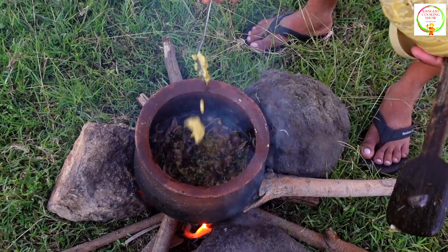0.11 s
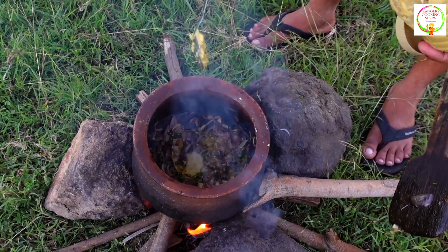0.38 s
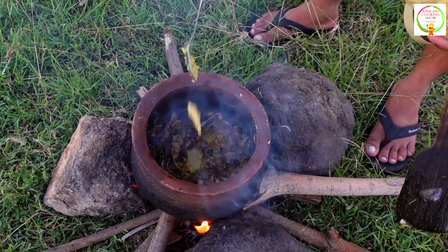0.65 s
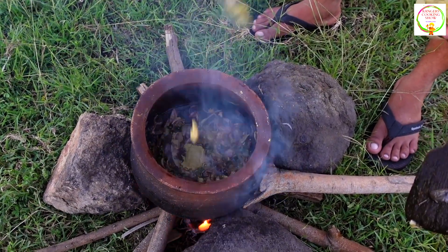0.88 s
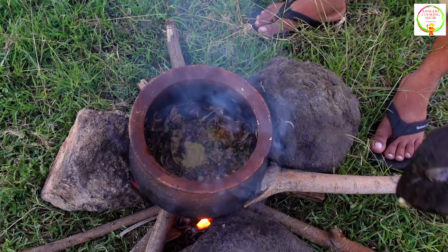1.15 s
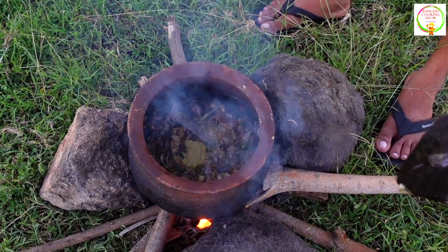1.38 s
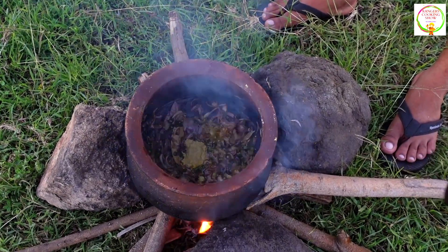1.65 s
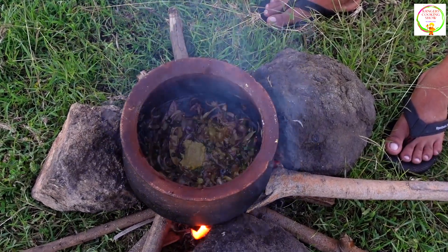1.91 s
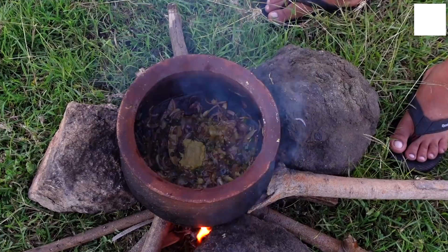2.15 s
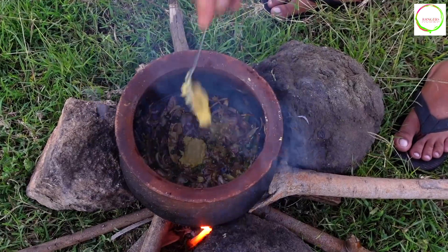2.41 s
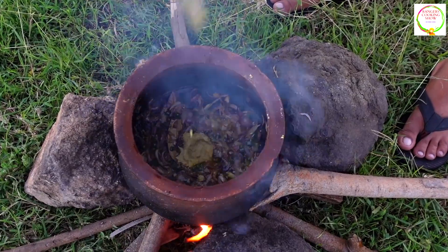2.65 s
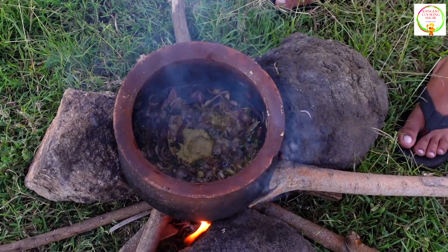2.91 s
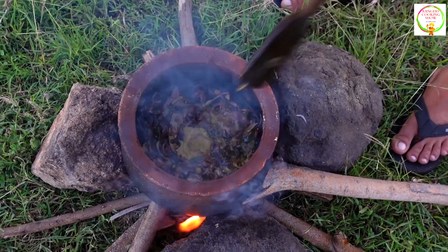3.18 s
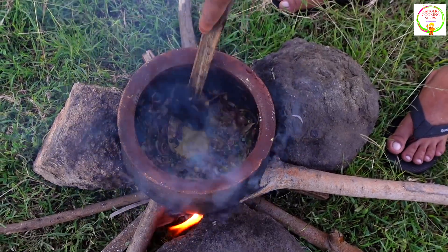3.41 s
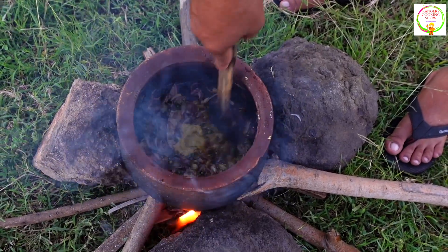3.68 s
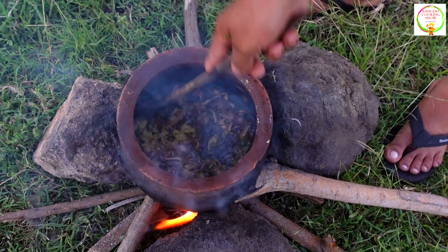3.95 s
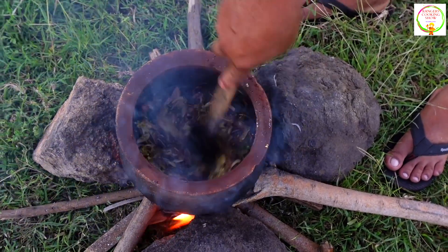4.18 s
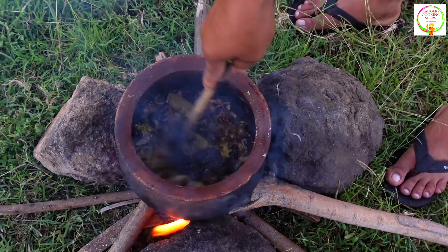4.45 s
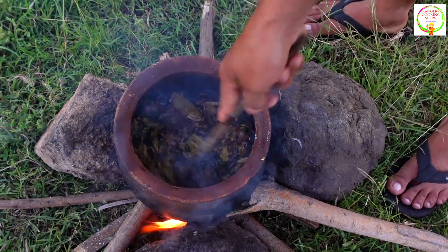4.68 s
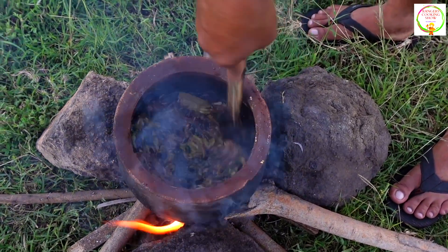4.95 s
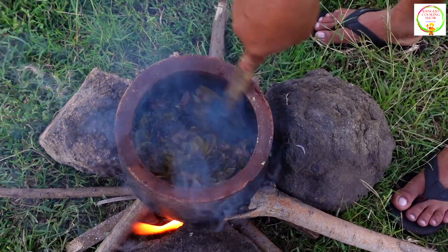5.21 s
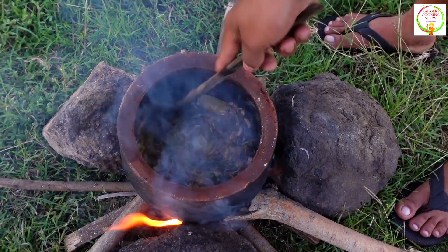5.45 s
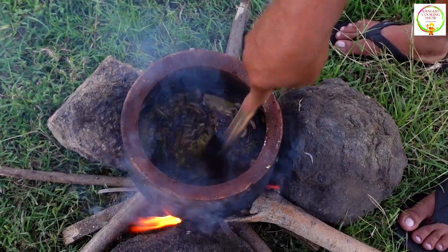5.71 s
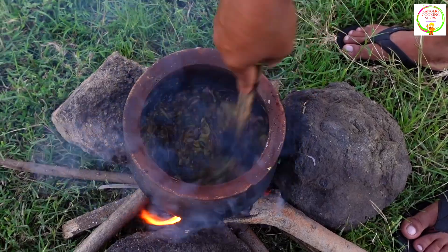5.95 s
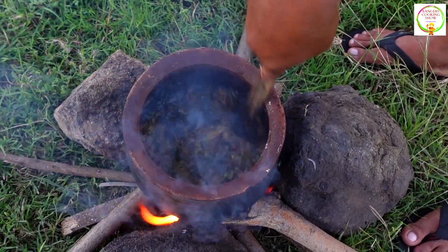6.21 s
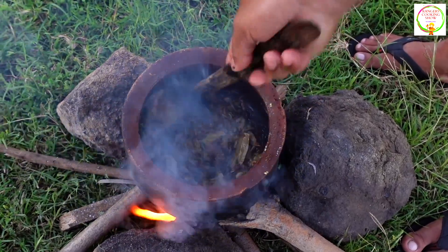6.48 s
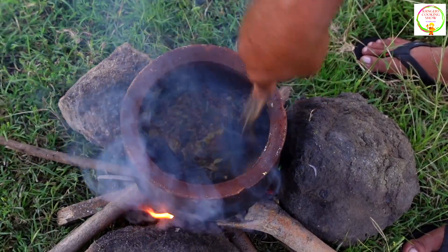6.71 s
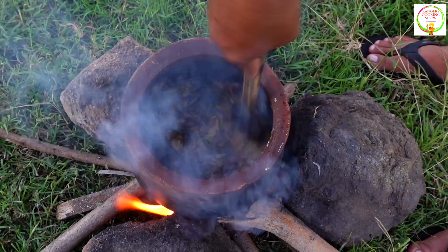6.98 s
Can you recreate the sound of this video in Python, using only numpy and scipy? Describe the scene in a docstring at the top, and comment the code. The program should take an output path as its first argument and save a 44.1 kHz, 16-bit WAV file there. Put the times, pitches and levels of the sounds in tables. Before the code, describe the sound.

Oil sizzles and spits in a clay pot outdoors, then a wooden spoon knocks and scrapes as stirring swells the frying into a dense hiss.

```python
"""Onions and spices fry in oil in a clay pot over a wood fire, outdoors, close to one microphone.
From 0 s: simmer (noise, bubble rings), spits (snap, fizz), low pocks (damped tones), bird chips (falling tones).
From 3.5 s: a wooden spoon knocks and scrapes the hollow pot (blows and slips ringing its modes).
From 3.6 s: stirring swells the frying to a dense hiss with gliding resonances.
Throughout: a faint flock, low roar (shaped noise), hum and far drone (wavering sines), even hush (noise)."""
import sys
import numpy as np
from scipy import signal
from scipy.io import wavfile
from scipy.ndimage import uniform_filter1d

SR = 44100
rng = np.random.default_rng(int(sys.argv[2]) if len(sys.argv) > 2 else 0)


def to_wav(s):
    """Save 16-bit WAV."""
    ch = np.atleast_2d(s).T  # columns
    pcm = np.round(np.clip(ch, -1, 1) * 32767)  # PCM
    wavfile.write(sys.argv[1], SR, pcm.astype(np.int16))


def convert_level_to_amplitude(level_db):
    """Map a level in decibels to its linear amplitude factor."""
    exponent = np.asarray(level_db, float) / 20
    return 10 ** exponent


N = 313154  # samples

# relative spectra of frying, alone and stirred: f/Hz, density/dB
SIMMER_SPECTRUM = [(160, -44), (280, -11), (342, -12), (462, 2), (573, -5.5), (736, -18.5), (1190, -13),
                   (1300, -13), (2070, -11.5), (2320, -7), (4370, -12), (5340, -4.5), (7830, -11),
                   (10500, -9.5), (12500, -10), (15000, -9.5)]
STIRRED_SPECTRUM = [(160, -44), (280, -25), (342, -14), (432, -16.5), (593, -10), (761, -22.5),
                    (1230, -7.5), (1390, -6), (2030, -1.5), (2280, -1.5), (3030, -0.5), (4100, -2),
                    (4650, -1.5), (5300, 1), (6300, -0.5), (7250, 1.5), (8600, -1.5), (10700, 1),
                    (13000, -0.5), (15000, -0.5)]
# clay wall resonances: f/Hz, width/Hz, boost/dB
WALL_MODES = [(1195, 25, 6), (1880, 26, 7), (2213, 16, 8.5), (2670, 24, -2)]
# air in the pot and its base, under the spoon: f/Hz, level at zero hardness/dB, t60/s
POT_MODES = [(255, -24, 0.032), (297, -14, 0.19), (433, -10.5, 0.21), (473, 17, 0.033), (574, 3, 0.04),
             (867, -8, 0.03), (1163, -2.5, 0.02), (1470, -34, 0.011), (1760, -18, 0.033)]
# individually timed oil spits and bright overtones of pocks:
# t/s, peak level before high-pass/dB, centre f/Hz, width/centre, fizz setting/dB
TIMED_SPITS = [(0.2325, -16.5, 6500, 1, -1), (0.3025, -26, 6300, .4, -15), (0.3355, -27, 6200, .4, -14),
               (0.445, -26, 5610, .74, -8), (0.507, -15.5, 6960, 1, -13), (0.625, -25.5, 10000, .41, -5),
               (0.6585, -24, 10000, .6, -7), (0.6935, -23.5, 3160, .94, -6), (0.7585, -18, 9000, 1, -7),
               (0.880, -18, 7260, 0.75, -8.5), (0.9225, -17.5, 5660, .6, -10),
               (1.0527, -20, 10200, .5, -10), (1.0697, -17, 14000, 0.45, -7), (1.167, -20, 14500, .4, -10),
               (1.189, -31, 2400, .5, -6), (1.1985, -26.5, 2600, .5, -6), (1.213, -31, 2370, 0.27, -8),
               (1.2362, -18, 9000, .6, -14), (1.238, -11.5, 6500, 1, -6), (1.302, -26, 2400, .95, -4),
               (1.338, -32, 3300, .5, -10), (1.4194, -20, 13600, .4, -6), (1.4523, -22, 12200, .4, -10),
               (1.5077, -24, 5250, .77, 0), (1.5585, -21.5, 5540, 0.88, -2), (1.6, -22.5, 5310, .7, 1),
               (1.656, -21, 4500, 0.78, -5), (1.6718, -22, 5900, 0.84, -6), (1.702, -17, 5310, .7, -9),
               (1.722, -18, 5450, 0.91, -3), (1.878, -22, 5900, .5, -8), (1.948, -20, 4970, 0.32, -6),
               (1.958, -22, 5730, .3, 0), (1.9866, -26, 10600, .5, -5), (2.0105, -22, 9000, .7, -7),
               (2.038, -19, 5500, .4, -9), (2.0765, -21, 5840, .4, -6), (2.114, -20, 5500, 0.26, -4.5),
               (2.1502, -16.5, 5700, 0.95, -5), (2.1685, -1.5, 9750, 0.98, -12.5),
               (2.2, -22, 5700, .35, -6), (2.3422, -12, 10500, .7, -16.5), (2.437, -25, 3060, 0.6, -8),
               (2.482, -18, 5530, 0.53, -13), (2.517, -19, 6310, 0.67, -3), (2.7995, -24.5, 2630, 0.26, -5),
               (2.8215, -18.5, 5200, 0.27, -9.5), (2.864, -23, 10400, 0.34, -5),
               (2.969, -20, 6500, .7, -5.5), (2.9987, -16, 10000, .6, -7), (3.027, -21.5, 6800, 0.56, -2),
               (3.094, -20, 7500, .8, -6), (3.2188, -20, 8500, .4, -14), (3.2375, -21.5, 4900, 0.3, -7),
               (3.283, -17, 13500, .4, -13), (3.3345, -17.5, 5700, 0.62, -7), (3.4195, -14, 6400, 1, -4.5),
               (3.582, -14, 6000, 0.44, -10), (3.6675, -11, 11500, .5, -13), (3.678, -19, 9500, .5, -8),
               (4.1994, -18, 5900, .2, 2), (5.587, -17, 2050, .5, -8)]
# low pocks (bursting bubbles, perhaps taps or firewood cracks): t/s, peak level/dB, f/Hz, t60/s
POCKS = [(0.195, -38, 500, 0.032), (0.232, -32.5, 514, 0.029), (0.242, -33.5, 448, 0.059),
         (0.758, -30.5, 507, 0.037), (1.031, -35, 500, 0.03), (1.188, -28, 710, 0.014),
         (1.21, -30, 750, 0.022), (1.301, -43, 2160, 0.04), (2.371, -33.5, 1600, 0.016),
         (2.523, -24.5, 470, 0.022), (3.031, -27, 754, 0.036), (3.272, -38, 500, 0.029),
         (3.424, -43, 1860, 0.033)]
# spoon knocks: t/s, ring peak level before high-pass/dB, hardness (0-1), pitch factor as spoon fills pot
KNOCKS = [(3.501, -16.5, 0.26, .81), (3.572, -30, 0.2, 0.61), (4.3949, -18, 0.47, 1.12),
          (4.404, -22.5, 0.1, .92), (5.084, -24.5, 0.57, 1.1), (5.1122, -10, 0.34, 1.15),
          (5.3, -17, 0.38, 1.08), (5.3205, -11.5, 0.11, 0.97), (5.438, -23.5, .4, .86),
          (5.719, -20.5, 0.37, 1.02), (5.792, -25.5, 0.4, 0.88), (6.075, -12.5, 0.45, 1.08),
          (6.12, -26, 0.4, 0.85), (6.198, -21.5, 0.62, 1.12), (6.292, -21.5, 0.2, 0.91),
          (6.3171, -9.5, 0.39, 1), (6.642, -18.5, 0.9, 0.54), (6.982, -24, 0.27, 1)]
# spoon strokes along the base: start t/s, rise/s, hold/s, fall/s, top level before high-pass/dB
STROKES = [(3.497, 0.0085, .01, 0.082, -35), (3.697, 0.022, .015, 0.067, -33),
           (4.046, 0.029, .03, .07, -42), (4.344, .035, .01, .05, -34.5),
           (4.669, 0.042, 0.061, 0.036, -37.5), (5.115, 0.0092, 0.04, .03, -40),
           (5.2, 0.028, 0.055, .02, -33.5), (5.28, .02, 0.031, 0.021, -28), (5.647, 0.067, 0.033, .02, -31),
           (5.76, 0.026, .015, .03, -36.5), (6.115, .015, 0.014, 0.02, -36), (6.182, .015, 0.055, .02, -35),
           (6.265, 0.017, 0.041, 0.033, -35), (6.366, 0.013, 0.024, 0.018, -42),
           (6.628, 0.032, 0.054, 0.042, -23.5), (6.858, .03, .01, .03, -41),
           (6.939, 0.042, 0.012, 0.067, -33)]
# near bird: start t/s, peak level/dB
CHIPS = [(0.0494, -41), (0.0725, -33), (0.1074, -31), (0.1464, -32.5), (0.193, -42), (0.2614, -41),
         (0.6344, -46), (0.7736, -32.5), (0.8114, -34), (0.9314, -38), (1.281, -34), (1.32, -33),
         (1.9214, -33), (2.4648, -38), (2.5042, -33), (3.705, -32)]
# relative spectrum of fire and distance: f/Hz, density/dB
ROAR_SPECTRUM = [(12, -46), (20, 3), (54, -2.5), (81, -1), (123, -3.5), (150, -4), (232, -8.5), (280, -24),
                 (330, -29), (430, -71), (730, -120)]
# roar and hum together: t/s, level/dB
ROAR_LEVEL = [(0, -44.5), (.4, -42.5), (1.56, -43), (2.2, -43.5), (4.0, -43), (5.0, -45), (6.3, -50.5),
              (7.1, -48)]
# faint hum tones: f/Hz, rms waver/Hz, peak level re roar rms/dB
HUM_TONES = [(49.5, 2.33, -12), (99.5, 2.8, -14), (148.8, 1.53, -4.5), (204, 2.84, -15)]
# food left alone in oil: t/s, level before patchiness/dB
SIMMER_LEVEL = [(0.0, -43.5), (0.67, -40.5), (1.0, -36.5), (1.4, -34.5), (2.0, -35), (2.34, -37.5),
                (2.81, -35), (3.38, -35), (3.7, -33)]
# food turned over by the spoon: t/s, hiss level before patchiness/dB
STIRRED_LEVEL = [(3.6, -42), (3.7, -40), (3.8, -26.5), (3.89, -26), (4.04, -31.5), (4.12, -27), (4.16, -22),
                 (4.23, -21.5), (4.3, -25), (4.57, -22), (4.65, -22.5), (4.84, -20), (5.05, -23),
                 (5.1, -21.5), (5.37, -24.5), (5.43, -23), (5.68, -24), (5.81, -20.5), (6.58, -26.5),
                 (7.1, -22.5)]
# ring of air over the moved food, levels before flicker: t/s, level/dB, f/Hz, next ring level/dB
AIR_RING = [(3.7, -51, 2000, -46), (3.78, -34, 1900, -37.5), (3.93, -37.5, 1930, -46),
            (4.03, -42, 1950, -44), (4.15, -36.5, 1980, -39.5), (4.5, -40.5, 1880, -40),
            (4.75, -38.5, 2050, -44), (5.05, -36, 1910, -35.5), (5.4, -35.5, 2030, -41),
            (5.85, -41, 1920, -36.5), (6.15, -38, 2000, -40), (7.1, -45, 2010, -47)]
# relative spectrum of the open air: f/Hz, density/dB
HUSH_SPECTRUM = [(250, -9), (350, -3), (1000, -3), (2000, -2.5), (4000, -13), (8000, -36)]
# far engine: t/s, peak level/dB, mean f/Hz
DRONE_TRACK = [(0, -45.5, 66), (1.5, -45, 66), (3.3, -51, 72), (3.6, -44, 72), (4.4, -45, 73),
               (4.9, -60, 76), (5.8, -50.5, 80), (7.1, -51, 80)]
# dulling of weak frying: threshold level/dB, tilt per dB below it/(dB/octave)
SIMMER_DULLING = (-33.5, 0.16)
STIRRED_DULLING = (-25.5, 0.35)

TOP_HZ, EDGE_HZ = 15000, 15780  # highest shaped frequency; low-pass edge
RING_WIDTH_HZ, UPPER_RING_RATIO = 280, 1.516
FULL_FIZZ_T60_S = 0.075
SMALL_SPITS, SMALL_UNTIL_S = 22, 3.6
SMALL_OVER_SIMMER_DB, SMALL_SPREAD_DB = 11, 1.5
SMALL_HZ, SMALL_SPREAD_OCTAVES = 5700, 0.48
SMALL_WIDTH_RATIO, SMALL_FIZZ_DB = 0.3, -8.5
POCK_RISE_S, POCK_HOLD_S = 0.0014, 0.0047
POCK_TAIL_DB, POCK_TAIL_T60_RATIO, POCK_WALL_DB = -20, 6.8, -38.5
CRACK_DB, CRACK_DB_PER_HARDNESS = -18, 22  # re ring
BLOW_S, SOFT_BLOW_EXTRA_S = 0.00026, 0.0015
STROKE_ENDS_DB, STROKE_ARCH_POWER = -17.5, 1.06  # ends re top
CHIP_S, CHIP_HZ, CHIP_FALL_SHARE = 0.018, 5840, 0.15
FLOCK_PER_S, FLOCK_MAX_DB = 30, -52.5
HUSH_LEVEL_DB = -60


def evened(x):
    """Scales to rms 1."""
    return x / np.sqrt(np.mean(x ** 2) + 1e-20)


def curve(rows, column=1):
    """Interpolates a table column over the scene."""
    rows = np.array(rows)
    return np.interp(np.arange(N) / SR, rows[:, 0], rows[:, column])


def add(mix, start_s, sound):
    """Mixes in a sound in place, cut at the end."""
    part = mix[round(start_s * SR):][:len(sound)]
    part += sound[:len(part)]


def colour(x, points, peaks=(), size=4096):
    """Minimum-phase filter: given spectrum plus resonances."""
    hz = abs(np.fft.fftfreq(size, 1 / SR))
    point_hz, point_db = np.transpose(points)
    log_hz = np.log(np.minimum(hz, TOP_HZ) + 1)
    gain = convert_level_to_amplitude(np.interp(log_hz, np.log(point_hz + 1), point_db))
    for centre_hz, width_hz, boost_db in peaks:
        gain = gain * (1 + (convert_level_to_amplitude(boost_db) - 1) / (1 + (2 * (hz - centre_hz) / width_hz) ** 2))
    log_gain = np.log(np.maximum(gain, 1e-5))
    phase = -signal.hilbert(log_gain).imag
    taps = np.fft.ifft(np.exp(log_gain + 1j * phase)).real[:size // 2]
    return signal.oaconvolve(x, taps / np.linalg.norm(taps))[:len(x)]


def band(x, hz, width_hz):
    """Two-pole resonance of peak gain 1."""
    return signal.lfilter(*signal.iirpeak(hz, hz / width_hz, SR), x)


def flicker(size):
    """Random wobble of rms 1, smoothed twice over size samples."""
    once = uniform_filter1d(rng.standard_normal(N), size)
    return evened(uniform_filter1d(once, size))


def clicks(per_s, spread_db):
    """Random clicks of random sign; dB size is spread_db times a capped exponential draw."""
    size = convert_level_to_amplitude(spread_db * np.minimum(rng.exponential(1, N), 3.2))
    sign = rng.choice([-1., 1.], N)
    return size * sign * (rng.random(N) < per_s / SR)


def bubbles(per_s, spread_db, cycles, count=16):
    """Tiny steam bubbles: each size has its own click train and rings a few cycles."""
    out = np.zeros(N)
    for hz in np.geomspace(400, 15000, count):
        train = clicks(per_s / count * np.sqrt(hz / 3000), spread_db)
        out += evened(band(train, hz, hz / cycles)) * np.sqrt(hz)
    return evened(out)


def glide(x, hz, width_hz):
    """Resonance following the curve hz: shift down to zero, smooth twice, shift back."""
    turn = np.exp(2j * np.pi * np.cumsum(hz) / SR)
    pole = np.exp(-np.pi * width_hz / SR)
    once = signal.lfilter([1 - pole], [1, -pole], x / turn)
    twice = signal.lfilter([1 - pole], [1, -pole], once)
    return evened((turn * twice).real)


def patchy(x, patch_db, tilt_db):
    """Parts of the pot flare and fade: random patches over time and pitch, plus a tilt in dB/octave."""
    hz, t, z = signal.stft(x, SR, nperseg=256, noverlap=192)
    field = rng.standard_normal(z.shape)
    field = uniform_filter1d(field, size=9, axis=0)
    field = evened(uniform_filter1d(field, size=30, axis=1))
    octaves = np.log2(np.maximum(hz, 1000) / 7000)[:, None]
    tilt = np.interp(t, np.arange(N) / SR, tilt_db) * octaves
    shaped = z * convert_level_to_amplitude(patch_db * field + tilt)
    return signal.istft(shaped, SR, nperseg=256, noverlap=192)[1][:N]


def dulling(level_db, setting):
    """Spectral tilt of weak frying, in dB/octave."""
    threshold_db, tilt_per_db = setting
    return tilt_per_db * np.minimum(level_db - threshold_db, 0)


def simmer():
    """Flickering hiss, separate bubble crackles and treble sprays, coloured by the clay wall."""
    level_db = curve(SIMMER_LEVEL)
    hiss = rng.standard_normal(N) * convert_level_to_amplitude(0.38 * flicker(size=500))
    crackle = convert_level_to_amplitude(-5.5) * bubbles(900, spread_db=7.0, cycles=2.4)
    spray_decay = np.exp(-np.arange(600) / 110.0)
    sprays = np.convolve(abs(clicks(60, spread_db=3.5)), spray_decay)[:N]
    droplets = convert_level_to_amplitude(-9.0) * evened(band(sprays * rng.standard_normal(N), 13400, 9600))
    coloured = evened(colour(hiss + crackle + droplets, SIMMER_SPECTRUM, WALL_MODES))
    return convert_level_to_amplitude(level_db) * patchy(coloured, 1.2, dulling(level_db, SIMMER_DULLING))


def stirred():
    """Dense hiss and bubbles with two gliding resonances of the air, faded in with the spoon."""
    level_db = curve(STIRRED_LEVEL)
    hiss = rng.standard_normal(N) * convert_level_to_amplitude(0.69 * flicker(size=500))
    seethe = hiss + convert_level_to_amplitude(-6) * bubbles(4000, spread_db=1.5, cycles=2.5)
    coloured = evened(colour(seethe, STIRRED_SPECTRUM))
    seethe = patchy(coloured, 0.95, dulling(level_db, STIRRED_DULLING))
    ring_hz = curve(AIR_RING, column=2)
    lower = glide(rng.standard_normal(N), ring_hz, RING_WIDTH_HZ)
    upper = glide(rng.standard_normal(N), UPPER_RING_RATIO * ring_hz, 2 * RING_WIDTH_HZ)
    ring = convert_level_to_amplitude(curve(AIR_RING)) * lower + convert_level_to_amplitude(curve(AIR_RING, column=3)) * upper
    fade_in = np.clip((np.arange(N) / SR - STIRRED_LEVEL[0][0]) / 0.14, 0, 1)
    return fade_in * (convert_level_to_amplitude(level_db) * seethe + convert_level_to_amplitude(flicker(size=300)) * ring)


def frying():
    """Simmering crackle, joined by the dense hiss of stirred food."""
    return simmer() + stirred()


def small_spits():
    """Rows for spits at random times, tied to the simmer level."""
    when, size, pitch = rng.random((SMALL_SPITS, 3)).T
    when_s = when * SMALL_UNTIL_S
    simmer_db = np.interp(when_s, *np.transpose(SIMMER_LEVEL))
    level_db = simmer_db + SMALL_OVER_SIMMER_DB + SMALL_SPREAD_DB * (2 * size - 1)
    hz = SMALL_HZ * 2 ** (SMALL_SPREAD_OCTAVES * np.tan(2.4 * (pitch - 0.5)))
    return [(s, db, f, SMALL_WIDTH_RATIO, SMALL_FIZZ_DB) for s, db, f in zip(when_s, level_db, hz)]


def spits():
    """Sharp snap round its centre pitch, then a noise fizz; a weaker fizz is also shorter."""
    out = np.zeros(N)
    t = np.arange(2500) / SR
    for start_s, db, hz, width_ratio, fizz_db in TIMED_SPITS + small_spits():
        fizz_t60_s = FULL_FIZZ_T60_S * convert_level_to_amplitude(fizz_db)
        hz = np.clip(hz, 1500, TOP_HZ)
        fizz = 0.37 * convert_level_to_amplitude(fizz_db - 60 * t / fizz_t60_s) * rng.standard_normal(len(t))
        snap = band((t == 0) + fizz, hz, width_ratio * hz)
        snap = band(snap, hz, min(2.5 * width_ratio * hz, 15000))
        add(out, start_s, convert_level_to_amplitude(db) * snap / abs(snap[:60]).max())
    return signal.sosfilt(signal.butter(2, 1200, "high", fs=SR, output="sos"), out)


def pocks():
    """Damped tone with a soft start and faint longer tail; each also rings the clay wall."""
    out = np.zeros(N)
    t = np.arange(5000) / SR
    # wall damped by three times its tabled width
    wall = sum(np.exp(-np.pi * 3 * width_hz * t) * np.sin(2 * np.pi * hz * t) for hz, width_hz, _ in WALL_MODES)
    for start_s, db, hz, t60_s in POCKS:
        body = convert_level_to_amplitude(-60 * np.maximum(t - POCK_HOLD_S, 0) / t60_s)
        tail = convert_level_to_amplitude(POCK_TAIL_DB - 60 * t / (POCK_TAIL_T60_RATIO * t60_s))
        rise = (1 - np.exp(-t / POCK_RISE_S)) ** 2
        tone = (body + tail) * rise * np.sin(2 * np.pi * hz * t)
        tone /= abs(tone).max()
        add(out, start_s, convert_level_to_amplitude(db) * tone + convert_level_to_amplitude(POCK_WALL_DB) * wall)
    return out


def pot_ring(hardness, pitch=1):
    """Decaying pot modes after one blow; a hard blow wakes the upper ones."""
    t = np.arange(4000) / SR
    out = np.zeros(len(t))
    for hz, db, t60_s in POT_MODES:
        tilt_db = 28.5 * hardness * np.log2(hz / 490)
        out += convert_level_to_amplitude(db + tilt_db - 60 * t / t60_s) * np.sin(2 * np.pi * hz * pitch * t)
    return out


def knocks():
    """Wood cracks on clay and rings the pot; softer blows last longer and blunt the ring."""
    out = np.zeros(N)
    t = np.arange(600) / SR
    for start_s, db, hardness, pitch in KNOCKS:
        crack = band(rng.standard_normal(len(t)) * np.exp(-t / 0.0018), 810, 1500)
        crack_db = db + CRACK_DB + CRACK_DB_PER_HARDNESS * hardness
        add(out, start_s, convert_level_to_amplitude(crack_db) * crack / abs(crack).max())
        contact_s = BLOW_S + SOFT_BLOW_EXTRA_S * (1 - hardness) ** 2
        blow = np.hanning(round(SR * contact_s) + 3)
        ring = np.convolve(pot_ring(hardness, pitch), blow)
        add(out, start_s, convert_level_to_amplitude(db) * ring / abs(ring).max())
    return out


def scrapes():
    """Uneven slips ring the pot modes under arched stroke envelopes."""
    out = np.zeros(N)
    slips = signal.oaconvolve(clicks(900, spread_db=2.5), pot_ring(0.45))[:N]
    # soft rubbing feeds mostly the air in the pot
    slips = evened(band(slips, 427, 320) + 0.072 * slips)
    for start_s, rise_s, hold_s, fall_s, db in STROKES:
        end_s = start_s + rise_s + hold_s + fall_s
        at = np.arange(round(start_s * SR), min(round(end_s * SR), N))
        corners_s = np.cumsum([0, rise_s, hold_s, fall_s])
        off_top = np.interp(at / SR - start_s, corners_s, [1, 0, 0, 1])
        arch = convert_level_to_amplitude(db + STROKE_ENDS_DB * off_top ** STROKE_ARCH_POWER)
        out[at] += arch * signal.windows.tukey(len(at), 0.15) * slips[at]
    return out


def spoon():
    """Knocks and scrapes, high-passed: a small pot radiates no bass."""
    high_pass = signal.butter(4, 240, "high", fs=SR, output="sos")
    return signal.sosfilt(high_pass, knocks() + scrapes())


def chip(hz):
    """Short whistle from hz that falls ever faster."""
    u = np.arange(0, 1, 1 / (CHIP_S * SR))
    turns = np.cumsum(hz * (1 - CHIP_FALL_SHARE * u ** 2)) / SR
    return np.sin(np.pi * u) * np.sin(2 * np.pi * turns)


def bird():
    """One near bird and a faint flock: random chips at five pitches."""
    out = np.zeros(N)
    for start_s, db in CHIPS:
        add(out, start_s, convert_level_to_amplitude(db) * chip(CHIP_HZ))
    for hz in np.linspace(5500, 6900, num=5):
        calls = clicks(FLOCK_PER_S / 5, spread_db=-2.0)
        out += convert_level_to_amplitude(FLOCK_MAX_DB) * signal.oaconvolve(calls, chip(hz))[:N]
    return out


def roar():
    """Low shaped noise with a few wavering hum tones."""
    low = evened(colour(rng.standard_normal(N), ROAR_SPECTRUM, size=16384))
    hum = np.zeros(N)
    for hz, waver_hz, db in HUM_TONES:
        turns = np.cumsum(hz + waver_hz * flicker(size=4000)) / SR
        hum += convert_level_to_amplitude(db) * np.sin(2 * np.pi * turns)
    return convert_level_to_amplitude(curve(ROAR_LEVEL)) * evened(low + hum)


def drone():
    """Far engine: one low sine wavering by 3.45 Hz rms."""
    hz = curve(DRONE_TRACK, column=2) + 3.45 * flicker(size=4000)
    return convert_level_to_amplitude(curve(DRONE_TRACK)) * np.sin(2 * np.pi * np.cumsum(hz) / SR)


def hush():
    """Steady shaped noise of the open air."""
    return convert_level_to_amplitude(HUSH_LEVEL_DB) * evened(colour(rng.standard_normal(N), HUSH_SPECTRUM))


def scene():
    """Sum of all sources, alike on both channels."""
    mono = frying() + spits() + pocks() + spoon() + bird() + roar() + drone() + hush()
    return np.array([mono, mono])


def roll_off(x):
    """The treble ends steeply here."""
    return signal.sosfilt(signal.butter(12, 16510, fs=SR, output="sos"), x)


def record(dry):
    """Band limit by a steep linear-phase low-pass."""
    taps = signal.firwin(1201, EDGE_HZ, window=("kaiser", 8), fs=SR)
    mix = signal.oaconvolve(dry, taps[None], "same")
    return roll_off(mix)


dry = scene()
out = record(dry)
to_wav(out)
```